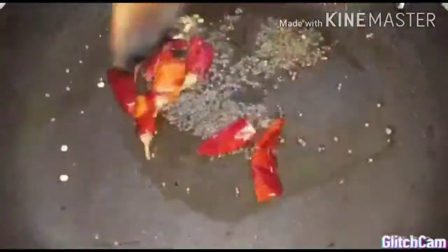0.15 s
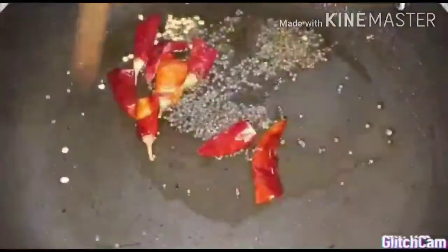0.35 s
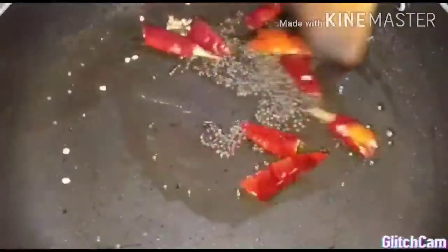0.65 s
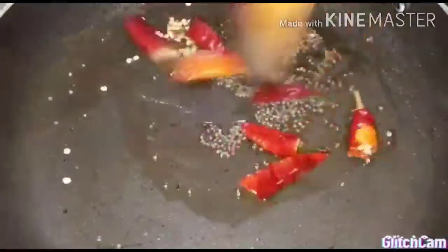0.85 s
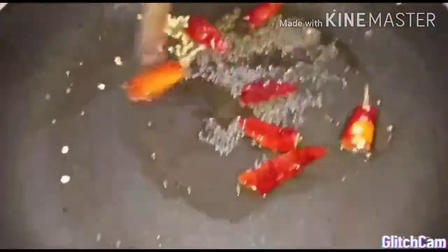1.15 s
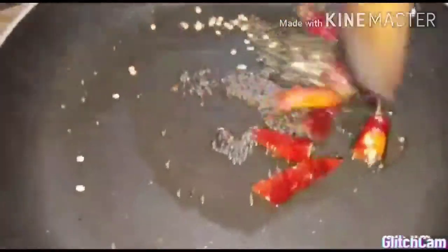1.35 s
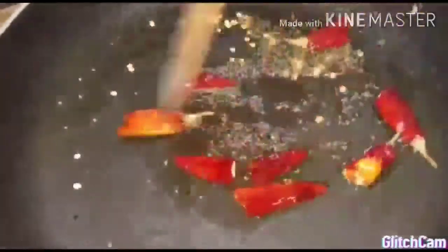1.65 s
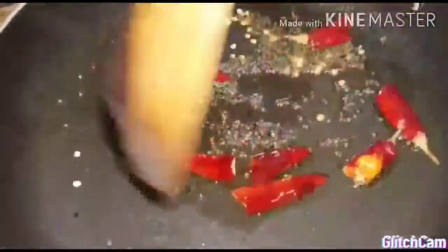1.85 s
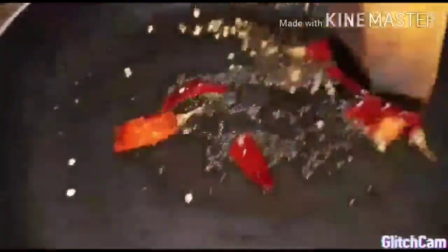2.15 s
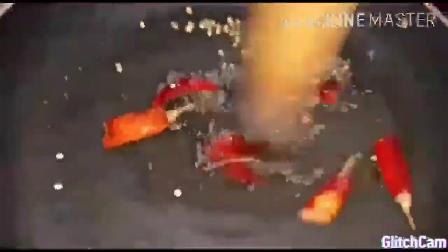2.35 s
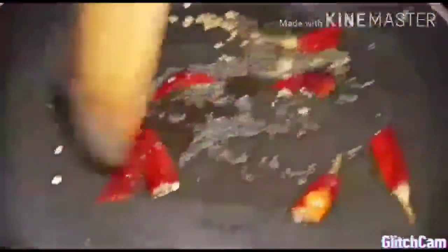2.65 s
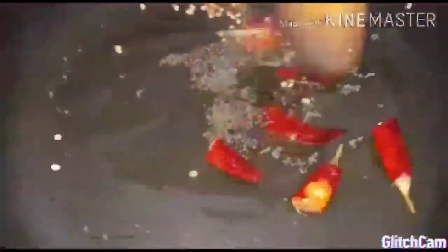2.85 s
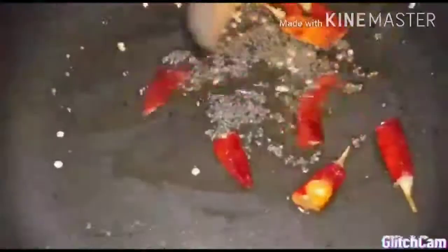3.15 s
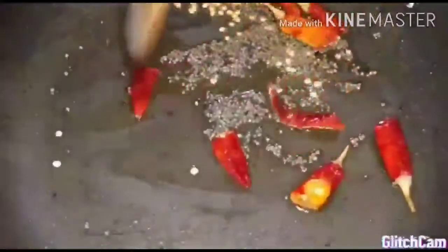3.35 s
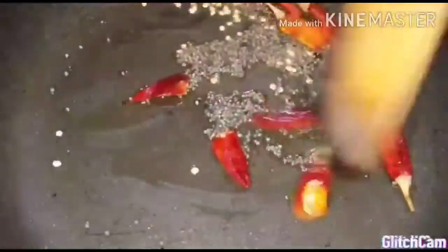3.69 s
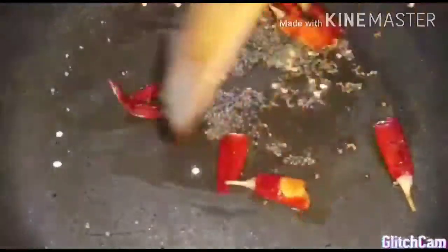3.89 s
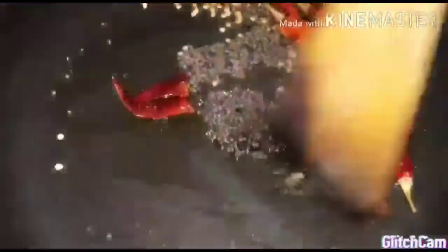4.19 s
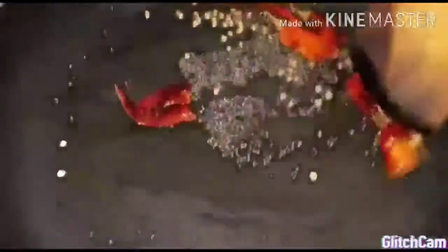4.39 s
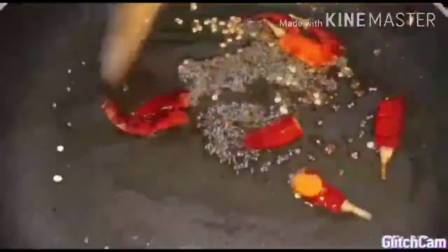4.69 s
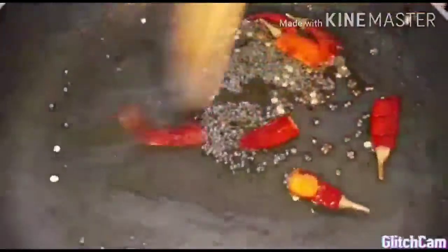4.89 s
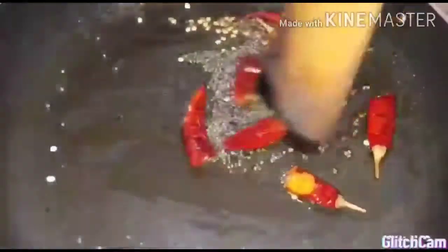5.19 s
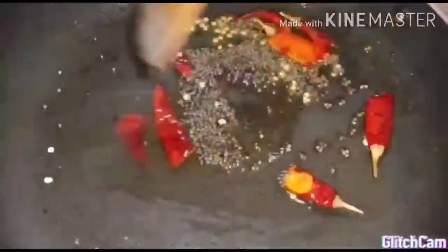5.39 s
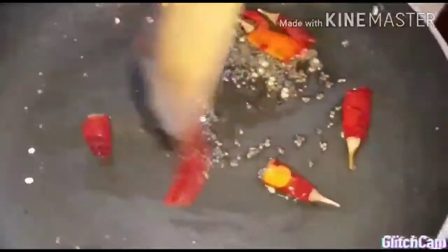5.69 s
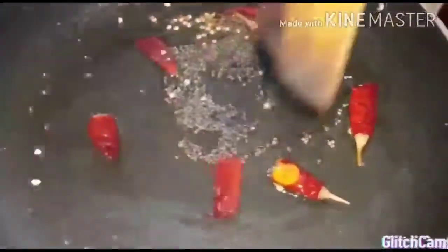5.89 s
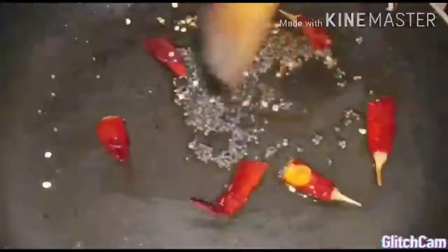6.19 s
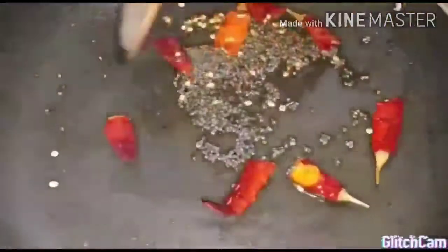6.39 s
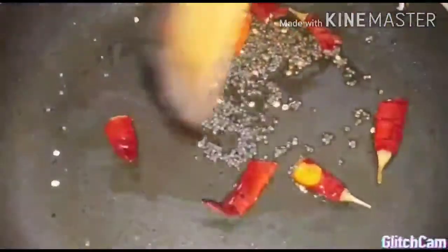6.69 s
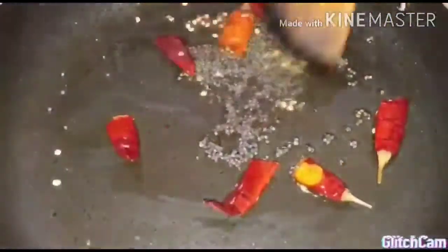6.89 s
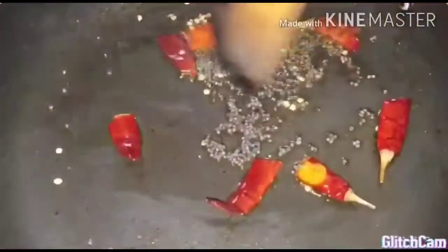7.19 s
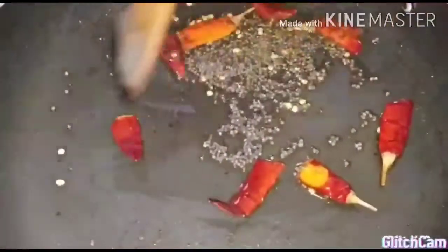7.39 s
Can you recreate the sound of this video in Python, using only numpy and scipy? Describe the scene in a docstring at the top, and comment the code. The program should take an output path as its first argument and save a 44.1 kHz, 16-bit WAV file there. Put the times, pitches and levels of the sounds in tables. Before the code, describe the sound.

Hot oil sizzles in bursts with each stir, seeds pop, wood clonks on a ringing pan, and the blade briefly judders and squeals.

```python
"""Hot oil fizzes and crackles at once in a pan, heard from close above in a small kitchen with a low room tone.
Clusters of tiny clicks make the fizz, pitched clicks the spitting; chilli seeds pop with a snap and a hollow note.
A wooden spatula knocks on the pan and rings its modes; its strokes rub, make the base groan and the oil flare up.
Friction also squeals in narrow resonances, and the blade judders along the dry wall in trains of hard slips."""
import sys
import numpy as np
from scipy import signal
from scipy.fft import rfft, irfft
from scipy.io import wavfile
from scipy.ndimage import uniform_filter1d

SR = 44100
rng = np.random.default_rng(int(sys.argv[2]) if len(sys.argv) > 2 else 0)


def inscribe(sig):
    """Save sig as 16-bit PCM at rate SR to the path in sys.argv[1].

    A 1-D sig is mono; a 2-D sig holds one channel per row.
    Samples are clipped to [-1, 1] before scaling.
    """
    pcm = np.round(np.clip(np.atleast_2d(sig).T, -1, 1) * 32767)
    wavfile.write(sys.argv[1], SR, pcm.astype(np.int16))


N = 332514
TIME = np.arange(N) / SR  # seconds


def from_db(db):
    """Decibels to gain."""
    return 10 ** (np.asarray(db) / 20)


def rms_one(x):
    """Scale to unit rms."""
    return x / np.sqrt(np.mean(x ** 2) + 1e-20)


def add(out, s, sound):
    """Mix a sound in at time s."""
    at = max(0, round(s * SR))
    out[at:at + len(sound)] += sound[:N - at]


def drift(rate):
    """Random wander of spread about 1, with a new target `rate` times a second."""
    return np.interp(TIME * rate, np.arange(4096), rng.standard_normal(4096))


def swell(peak_s, rise_s, fall_s, curve):
    """Gain that climbs to 1 and dies away; it is a tenth at the rise time before and the fall time after."""
    distance = np.maximum((peak_s - TIME) / rise_s, (TIME - peak_s) / fall_s)
    return from_db(-20 * np.minimum(distance, 10) ** curve)


def colour(x, spectrum, size=4096):
    """Causal minimum-phase filter of unit energy with the given spectrum."""
    hz, db = np.transpose(spectrum)
    grid = np.maximum(np.arange(size // 2 + 1) * SR / size, 1)
    log_gain = np.log(from_db(np.interp(np.log(grid), np.log(hz), db)))
    cepstrum = irfft(log_gain)
    # folding the cepstrum onto positive times makes the phase minimal
    response = irfft(np.exp(rfft(2 * cepstrum[:size // 2], size)))
    return signal.oaconvolve(x, response / np.linalg.norm(response))[:len(x)]


def resonate(x, resonances):
    """Parallel resonances of alternating sign; rms 1."""
    out = 0
    for k, (hz, width, db) in enumerate(resonances):
        r = np.exp(-np.pi * width / SR)
        poles = [1, -2 * r * np.cos(2 * np.pi * hz / SR), r * r]
        gain = (-1) ** k * from_db(db) * (1 - r * r) / 2
        out = out + gain * signal.lfilter([1, 0, -1], poles, x + 1e-18)
    return rms_one(out)


def sustained(resonances, size=600):
    """Friction keeps a set of resonances ringing at an even strength."""
    tone = resonate(rng.standard_normal(N), resonances)
    return tone / np.sqrt(uniform_filter1d(tone ** 2, size=size) + 1e-9)


def burst(t60, scatter_db, size=8192):
    """A click followed by its dying scatter between the pan's walls; unit energy."""
    scatter = rng.standard_normal(size) * from_db(-60 * TIME[:size] / t60)
    x = scatter * from_db(scatter_db) / np.linalg.norm(scatter)
    x[0] = 1
    return x / np.linalg.norm(x)


def grains(per_s, spread_db):
    """Random clicks of either sign: many small, a few large."""
    clicks = np.zeros(N)
    at = np.flatnonzero(rng.random(N) < per_s / SR)
    size = np.minimum(rng.exponential(1, N)[at], 5)
    sign = 2 * rng.integers(0, 2, N)[at] - 1
    clicks[at] = from_db(spread_db * size) * sign
    return clicks


# Spectrum of the quiet kitchen. Each row: frequency in Hz, relative density in dB per Hz.
ROOM_TONE_SPECTRUM = [(25, -32), (55, -26.5), (80, -10.5), (102, 4), (140, -8), (300, -11.5), (420, -16),
                      (800, -11.5), (1600, -12.5), (4000, -25.5), (16000, -31)]
ROOM_TONE_DB = -61


def room_tone():
    """The kitchen's low background: steady noise with most of its weight in the bass."""
    return from_db(ROOM_TONE_DB) * colour(rng.standard_normal(N), ROOM_TONE_SPECTRUM)


# The oil left to itself, calming after an early rise. Each row: time in seconds, relative fizz level in dB.
SIMMER = [(0.0, -55.5), (1.0, -50), (1.9, -56), (2.35, -57.5), (3.0, -57), (4.3, -57.5), (5.6, -58.5),
          (6.3, -66), (7.54, -65.5)]
# Spatula strokes, each rubbing the pan and turning wet spice into the oil. Each row: time of its height,
# rise and fall in seconds, relative rub level in dB, relative flare of the frying in dB.
STROKES = [(0.19, 0.08, 0.15, -44, -53.5), (0.321, 0.09, 0.16, -38.5, -39.5),
           (0.68, 0.12, 0.14, -50.5, -46), (1.03, 0.1, 0.28, -38, -37.5), (1.269, 0.08, 0.083, -72, -37),
           (1.7, 0.24, 0.53, -41.5, -37.5), (2.18, 0.14, 0.085, -48, -43.5),
           (2.618, 0.19, 0.14, -37.5, -40), (3.25, 0.14, 0.07, -39, -49.5), (3.5, 0.07, 0.21, -37, -48.5),
           (3.94, 0.05, 0.67, -65.5, -55), (4.76, 0.2, 0.24, -69.5, -47), (5.08, 0.2, 0.13, -82, -48),
           (5.5, 0.14, 0.11, -44, -55), (5.85, 0.12, 0.73, -58.5, -51.5), (6.59, 0.2, 0.22, -46, -49.5),
           (6.98, 0.3, 0.12, -57, -52), (7.49, 0.19, 0.12, -42, -53.5)]
STROKE_CURVE = 1.04   # 1: a pointed swell, 2: a rounded one


def stirring():
    """Gain of the rubbing and of the frying over time: every stroke makes the simmering oil flare up."""
    rub = 0
    heat = from_db(np.interp(TIME, *np.transpose(SIMMER))) ** 2
    for s, rise_s, fall_s, rub_db, flare_db in STROKES:
        push = swell(s, rise_s, fall_s, STROKE_CURVE)
        rub = rub + from_db(rub_db) * push
        heat = heat + (from_db(flare_db) * push) ** 2
    return rub, np.sqrt(heat)


# Spectrum of the bursting bubbles. Each row: frequency in Hz, relative density in dB per Hz.
FIZZ_SPECTRUM = [(500, -32.5), (2300, -2.5), (4000, -14), (6500, -16), (7700, -11), (8700, -2.5),
                 (9600, -8.5), (11000, -14.5), (13000, -19.5), (16000, -23.5)]
FIZZ_REFERENCE_DB = -49   # frying level at which treble and crackle have their stated gains
# treble above the corner: gain at the reference, share of the frying's swing in dB that it adds
TREBLE_HZ, TREBLE_DB, TREBLE_FOLLOWS = 10500, -3, 0.51


def fizz(sizzle):
    """Countless tiny steam bubbles burst at the oil's surface, in quick clusters; hard frying is brighter."""
    bubbles = rms_one(colour(grains(per_s=2600, spread_db=2.0), FIZZ_SPECTRUM))
    low = signal.sosfilt(signal.butter(3, TREBLE_HZ, "low", fs=SR, output="sos"), bubbles)
    high = signal.sosfilt(signal.butter(3, TREBLE_HZ, "high", fs=SR, output="sos"), bubbles)
    treble = from_db(TREBLE_DB) * (sizzle / from_db(FIZZ_REFERENCE_DB)) ** TREBLE_FOLLOWS
    clusters = from_db(-2.0 + 3.5 * drift(45))
    return (low + treble * high) * sizzle * clusters


# Spectrum of spits and snapping seeds. Each row: frequency in Hz, relative density in dB per Hz.
SNAP_SPECTRUM = [(300, -19), (2000, -26.5), (4000, -12.5), (6500, -15), (7600, -4), (8700, 7), (9800, -2.5),
                 (11000, -12.5), (13000, -19.5), (16000, -8.5)]
# relative level at the fizz reference, how closely it follows the fizz, and its loss as the spice dries
CRACKLE_DB, CRACKLE_FOLLOWS, DRYING_DB_PER_S = -50, 0.52, 1.18


def crackle(sizzle, count=8):
    """Larger bubbles and small seeds spit at one of several pitches, thicker as the frying grows."""
    drying = from_db(CRACKLE_DB - DRYING_DB_PER_S * TIME)
    strength = drying * (sizzle / from_db(FIZZ_REFERENCE_DB)) ** CRACKLE_FOLLOWS
    vigour = strength / strength.mean()
    clicks = grains(per_s=45 * vigour ** 0.81, spread_db=4.0)
    dealt = rng.integers(0, count, N)   # which pitch each click gets
    rings = 0
    for k, hz in enumerate(np.geomspace(4200, 14500, count)):
        spit = burst(t60=0.012, scatter_db=0, size=1024)
        spits = signal.oaconvolve(clicks * (dealt == k), spit)[:N]
        rings = rings + resonate(spits, [(hz, 3500, 0)])
    return rms_one(colour(rings, SNAP_SPECTRUM)) * strength.mean() * vigour ** 0.88 * from_db(0.5)


# The loudest seeds bursting. Each row: start in seconds, relative snap level in dB,
# relative level of the hollow note in dB, its pitch in Hz, time the husk takes to tear in seconds.
POPS = [(0.0359, -35, -35.5, 1950, 0.012), (0.2923, -31, -53, 2890, 0.031), (0.4404, -44, -60, 2100, 0.011),
        (0.539, -40.5, -40, 3300, 0.015), (0.6937, -31, -54, 2800, 0.0071),
        (0.7081, -52, -24.5, 2020, 0.025), (0.8062, -27, -67, 3300, 0.0024),
        (0.9894, -37.5, -25.5, 3780, 0.031), (1.2466, -25, -21, 2300, 0.03),
        (1.3713, -35.5, -39.5, 3000, 0.02), (1.5561, -27, -28, 2600, 0.012),
        (1.9307, -30.5, -42, 2700, 0.022), (1.9967, -32, -27, 2540, 0.043),
        (2.0375, -34.5, -49, 2700, 0.03), (2.185, -39.5, -56, 2800, 0.025), (2.4, -39, -40, 3720, 0.023),
        (2.7186, -19, -17, 1460, 0.044), (2.9287, -41, -40, 3200, 0.033), (3.0483, -43, -37.5, 4200, 0.029),
        (3.257, -36, -65.5, 3480, 0.025), (3.6688, -36.5, -68.5, 2200, 0.015),
        (3.811, -37.5, -69, 2700, 0.0087), (3.9472, -38, -36, 3500, 0.019),
        (4.178, -38.5, -42, 3680, 0.0095), (7.3834, -39, -40, 2170, 0.025)]
# Spectrum of the hollow notes. Each row: frequency in Hz, relative density in dB per Hz.
HOLLOW_SPECTRUM = [(60, -26.5), (250, 17.5), (900, 7.5), (2000, 10.5), (3500, 2), (7000, 5), (16000, -38.5)]
# a harder burst damps its husk more: width of the note after a middling snap, and the rise that doubles it
HUSK_WIDTH_HZ, MIDDLING_SNAP_DB, HUSK_DOUBLING_DB = 1400, -35.5, 14


def pops(size=4096):
    """A seed splits with a bright snap and a hollow note from its husk; a slow tear is a ragged one."""
    snap, body = np.zeros(N), np.zeros(N)
    for s, snap_db, hollow_db, hz, tear_s in POPS:
        add(snap, s, from_db(snap_db) * burst(t60=tear_s, scatter_db=16.5))
        width = HUSK_WIDTH_HZ * 2 ** ((snap_db - MIDDLING_SNAP_DB) / HUSK_DOUBLING_DB)
        tear = burst(t60=tear_s, scatter_db=4, size=size)
        husk = resonate(tear, [(hz, width, 0)]) / np.sqrt(size)   # unit energy
        add(body, s, from_db(hollow_db) * husk)
    return from_db(24.5) * colour(snap, SNAP_SPECTRUM) + from_db(17) * colour(body, HOLLOW_SPECTRUM)


def pan_modes(family, size=22050):
    """The ring of each mode of a family after a unit blow; it takes a moment to spread over the pan."""
    hz, db, t60 = np.transpose(family)[:, :, None]
    t = TIME[:size]
    spreading = 1 - np.exp(-t / 0.00086)
    return spreading * from_db(db - 60 * t / t60) * np.sin(2 * np.pi * hz * t)


# Spatula blows. Each row: start in seconds, relative thud level in dB, relative ring level in dB,
# kind of contact.
KNOCKS = [(0.1518, -14.5, -21, "base"), (0.41, -34, -30.5, "touch"), (0.5155, -43, -42.5, "touch"),
          (0.8826, -20, -18.5, "rim"), (1.1102, -35.5, -31.5, "touch"), (1.5782, -57, -30.5, "touch"),
          (1.6289, -47, -32, "touch"), (1.8495, -34.5, -33.5, "touch"), (2.1363, -37, -36.5, "touch"),
          (2.4353, -13.5, -14, "base"), (2.5021, -30, -20.5, "base"), (3.1598, -13, -10.5, "base"),
          (3.4667, -14.5, -16.5, "wall"), (3.8982, -21.5, -21.5, "wall"), (4.5665, -13, -9.5, "base"),
          (4.9725, -21, -17.5, "base"), (5.385, -24, -18, "glance"), (5.6944, -30, -43, "glance"),
          (6.3749, -29, -28.5, "glance"), (6.665, -36, -31.5, "touch"), (6.7975, -27, -25.5, "lip"),
          (6.9085, -39, -40.5, "touch"), (6.9611, -64, -42.5, "touch"), (7.3221, -24.5, -20.5, "glance")]
# Ways of meeting the pan, by kind. Each row: brightness of the contact in Hz, then the relative ring in dB
# of each mode family: support, base, rim, lip, wall, upper wall.
CONTACTS = {"base": (1498, -24, -13, -34, -25, -17.5, -32), "wall": (2300, -36, -14.5, -47, -43, -1, -16.5),
            "rim": (2592, -12, -7.5, -8.5, -11, -18, -38), "lip": (5000, -11, -16, -19.5, -4, -8.5, -35),
            "glance": (4500, -24.5, -50, -33, -25, -29, -19),
            "touch": (4500, -11, -17.5, -50, -32, -14, -22)}
# Pan modes, one family a line in that same order. Each mode: frequency in Hz, relative level in dB,
# time to fade by 60 dB in seconds.
PAN_FAMILIES = [
    [(266.3, -6.5, 0.12), (315.2, -4.5, 0.17), (347.5, -9, 0.22)],
    [(765, -8, 0.45), (808, -1.5, 0.14), (843, -5.5, 0.099), (977, -4, 0.057), (1070.6, -8.5, 0.19)],
    [(1271, -0.5, 0.28), (2446, 0, 0.34)],
    [(3124, -12.5, 0.17), (3770, -13.5, 0.1), (5580, -25, 0.13)],
    [(1434, 4.5, 0.08), (1490, -20, .1)],
    [(1844, -1.5, .1), (2221, 2, 0.15), (2297, 4.5, 0.078), (2876, -19.5, 0.63)],
]
# Spectrum of the dull thud. Each row: frequency in Hz, relative density in dB per Hz.
THUD_SPECTRUM = [(60, -65), (170, -38), (280, -5.5), (400, -15), (500, -4.5), (650, -7.5), (820, 3.5),
                 (1150, -1.5), (1850, 3.5), (2350, 0), (3000, -6.5), (3800, -8.5), (5000, -9.5),
                 (16000, -3)]


def knocks(bass_share=0.085):
    """Wood meets metal: a dull thud, and the place of contact decides which pan modes ring."""
    thud, ring = np.zeros(N), np.zeros(N)
    families = [pan_modes(family) for family in PAN_FAMILIES]
    for s, thud_db, ring_db, kind in KNOCKS:
        contact_hz, *family_db = CONTACTS[kind]
        # a light, hard contact is both brighter and thinner than a heavy, soft one
        band_hz = [contact_hz * bass_share, contact_hz]
        contact = signal.butter(2, band_hz, "band", fs=SR, output="sos")
        impact = burst(t60=0.06, scatter_db=0)
        add(thud, s, from_db(thud_db) * signal.sosfilt(contact, impact))
        for modes, db in zip(families, family_db):
            signs = rng.choice([-1, 1], len(modes))
            add(ring, s, from_db(ring_db + db) * (signs @ modes))
    return from_db(27.5) * colour(thud, THUD_SPECTRUM) + from_db(5.5) * ring


# Pan resonances fed by rubbing. Each row: frequency in Hz, width in Hz, relative level in dB.
RUB_RESONANCES = [(111, 47, -2.5), (300, 57, -5.5), (787, 150, 2.5), (1012, 82, 2.5), (1414, 25, 6),
                  (1860, 320, -7.5), (2300, 190, -1.5), (3070, 270, -17)]


def rubbing(rub):
    """The blade drags seeds over the metal: dense uneven clicks excite the pan's resonances."""
    sliding = resonate(grains(per_s=2300, spread_db=10.0), RUB_RESONANCES)
    return from_db(-9) * sliding * rub * from_db(1.5 + 5.5 * drift(35))


# Strokes pressed hard enough to make the base groan. Each row: time of the height, rise and fall in seconds,
# level in dB.
PRESSING = [(1.803, 0.081, 0.012, -33), (6.565, 0.086, 0.04, -49)]
# Base resonances that groan. Each row: frequency in Hz, width in Hz, relative level in dB.
GROAN_RESONANCES = [(984, 23, 2.5), (1034, 200, -9), (1472, 22, 4)]


def groan():
    """Pressed harder, the sliding blade keeps resonances of the pan's base ringing."""
    pressure = sum(from_db(db) * swell(s, rise_s, fall_s, curve=1.0) for s, rise_s, fall_s, db in PRESSING)
    return sustained(GROAN_RESONANCES) * pressure


# The wall squealing under the spatula's edge. Each row: time of the height, rise and fall in seconds,
# relative level in dB.
SQUEALS = [(4.65, 0.06, 0.049, -31.5), (5.709, 0.012, 0.051, -24.5), (5.84, 0.025, 0.069, -42)]
# Wall resonances that squeal. Each row: frequency in Hz, width in Hz, relative level in dB.
SQUEAL_RESONANCES = [(1576, 340, -11), (2036, 35.5, 4), (2300, 130, -12.5), (2600, 210, -20),
                     (2816, 16, 0.5), (3300, 1100, -28.5), (4478, 32, -9.5), (6630, 37, -36),
                     (7310, 50, -12), (8200, 80, -22), (8900, 61, -21.5), (10650, 86, -26),
                     (14300, 60, -38.5), (15300, 59, -43.5)]


def squeal():
    """The spatula's edge feeds the high, narrow modes of the pan wall."""
    grip = sum(from_db(db) * swell(s, rise_s, fall_s, curve=1.53) for s, rise_s, fall_s, db in SQUEALS)
    return sustained(SQUEAL_RESONANCES) * grip * from_db(3.5)


# The blade catching on the dry wall. Each row: start in seconds, length in seconds, relative level in dB.
JUDDERS = [(4.62, 0.07, -28.5), (4.7227, 0.078, -14), (4.8445, 0.14, -16)]
# Spectrum of a slip. Each row: frequency in Hz, relative density in dB per Hz.
SLIP_SPECTRUM = [(60, -39), (150, -35), (260, -28), (450, -37), (850, -15), (1150, -13.5), (1450, -6),
                 (1850, 5.5), (2250, -1), (2900, -11.5), (3600, -19), (5000, -36), (7000, -52),
                 (16000, -69)]
# Pan resonances set singing by the slips. Each row: frequency in Hz, width in Hz, relative level in dB.
SLIP_RESONANCES = [(1540, 30, -7.5), (2870, 17, -11.5)]
# Thin whine on top. Each row: frequency in Hz, width in Hz, relative level in dB.
WHINE_RESONANCES = [(12560, 43, -5.5), (14000, 120, -14.5)]
# the grip sags from the start and lets go faster once the length is over; the first slip has its own level
JUDDER_SAG_DB_PER_S, JUDDER_RELEASE_DB_PER_S, FIRST_SLIP_DB = 44, 404, 5


def judder(slips_per_s=185, unevenness=0.25, count=60):
    """The blade sticks and slips in uneven hard knocks that set the pan singing, with a thin whine on top."""
    force, effort = np.zeros(N), np.zeros(N)
    for start, length, db in JUDDERS:
        age = np.maximum(TIME - start, 0)
        release_db = JUDDER_RELEASE_DB_PER_S * np.clip(age - length, 0, 1)
        grip = (TIME >= start) * from_db(db - JUDDER_SAG_DB_PER_S * age - release_db)
        gap_chance, size_chance = rng.standard_normal((count, 2)).T
        gaps = np.exp(unevenness * gap_chance) / slips_per_s
        sizes_db = 1.3 * size_chance
        sizes_db[0] = FIRST_SLIP_DB
        slip_times = start + 1 / SR + np.cumsum(gaps) - gaps
        slips = np.zeros(N)
        for s, size_db in zip(slip_times, sizes_db):
            add(slips, s, from_db(size_db) * burst(t60=0.02, scatter_db=0, size=1024))
        force += slips * np.sqrt(SR / slips_per_s) * grip
        effort += grip
    rasp = from_db(-3.5) * colour(force, SLIP_SPECTRUM)
    singing = from_db(-47.0) * resonate(force, SLIP_RESONANCES)
    whine = from_db(-39.5) * effort * sustained(WHINE_RESONANCES)
    return rasp + singing + whine


# Spectrum returned by the kitchen walls. Each row: frequency in Hz, relative density in dB per Hz.
WALLS_SPECTRUM = [(60, -7.5), (300, 1.5), (600, -1), (2000, -4), (5000, -4), (9000, -5), (16000, -4.5)]
KITCHEN_T60_S = 0.54


def kitchen(x, size=35000):
    """Hard walls return a diffuse tail that builds up over a few milliseconds."""
    t = TIME[:size]
    envelope = from_db(-60 * t / KITCHEN_T60_S) * (1 - np.exp(-t / 0.001))
    tail = colour(rng.standard_normal(size) * envelope, WALLS_SPECTRUM)
    return signal.oaconvolve(x, tail / np.linalg.norm(tail))[:N]


def scene():
    """Frying and spatula in the kitchen, over a low room tone."""
    rub, sizzle = stirring()
    frying = fizz(sizzle) + crackle(sizzle) + pops()
    blows = knocks()
    friction = rubbing(rub) + groan() + judder() + squeal()
    echo = kitchen(from_db(-9.5) * frying + from_db(-8.0) * blows + from_db(-1) * friction)
    return (frying + blows + friction + echo + room_tone())[None]


CUTOFF_HZ = 15400


def record(dry, ceiling=0.9):
    """A small microphone: little bass, the highest peaks rounded, the top cut."""
    bass_cut = signal.butter(3, 70, "high", fs=SR, output="sos")
    top_cut = signal.ellip(10, 0.1, 70, CUTOFF_HZ, fs=SR, output="sos")
    x = signal.sosfilt(bass_cut, dry)
    rounded = x / (1 + (x / ceiling) ** 8) ** (1 / 8)
    return signal.sosfilt(top_cut, rounded)


dry = scene()
out = record(dry)
inscribe(out)
```